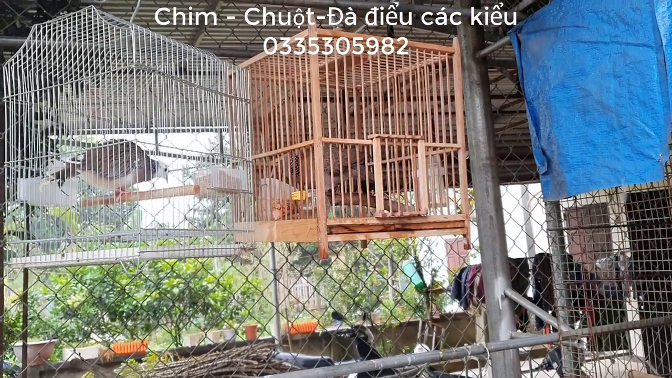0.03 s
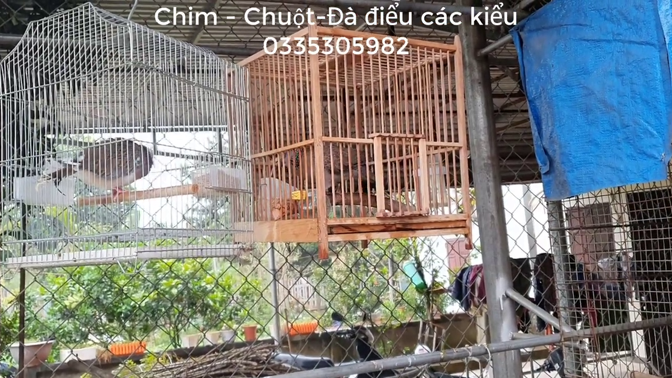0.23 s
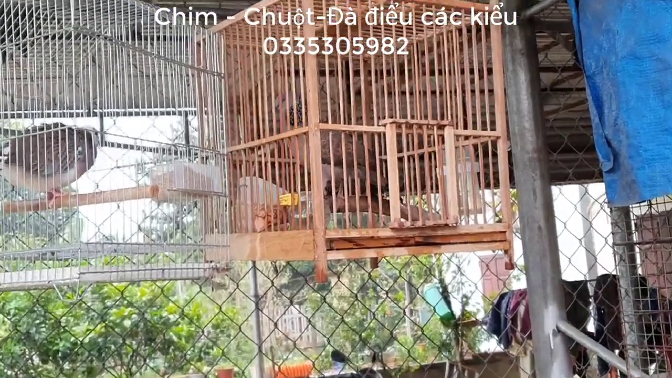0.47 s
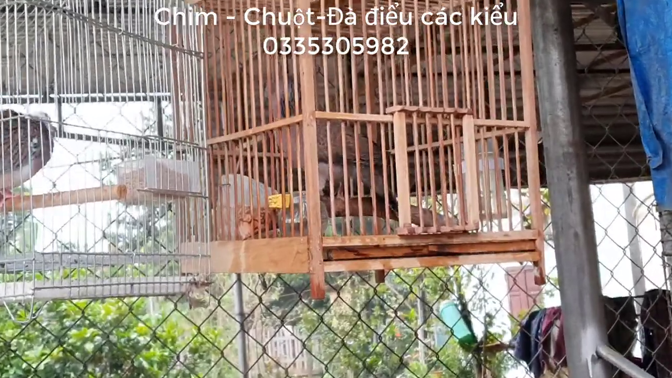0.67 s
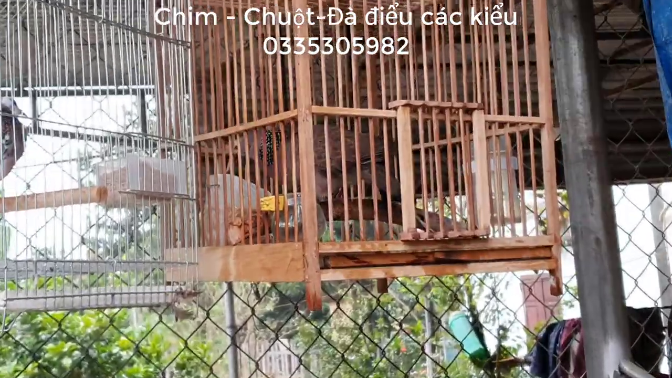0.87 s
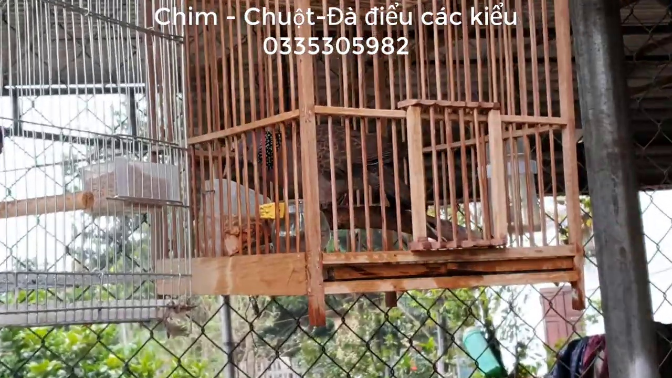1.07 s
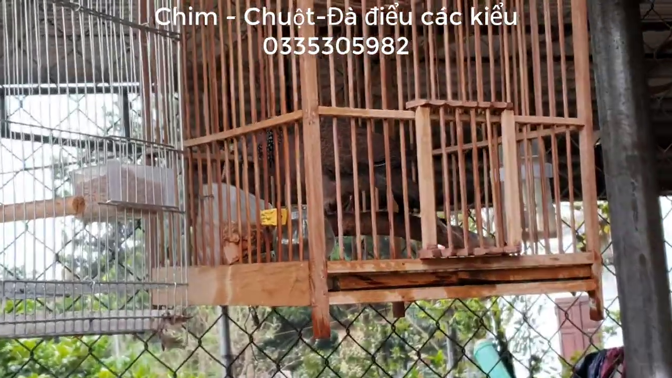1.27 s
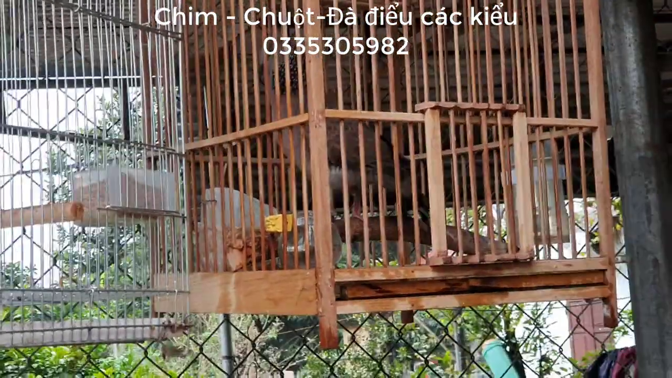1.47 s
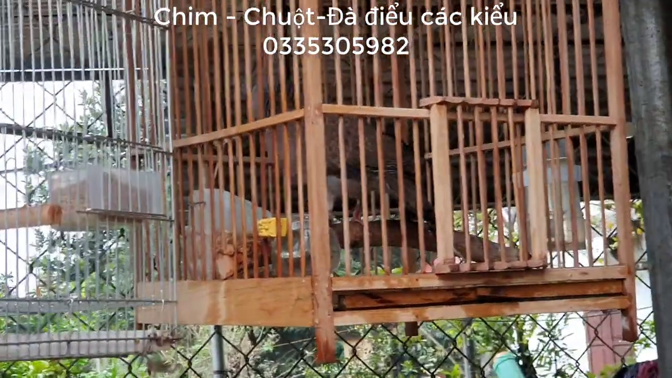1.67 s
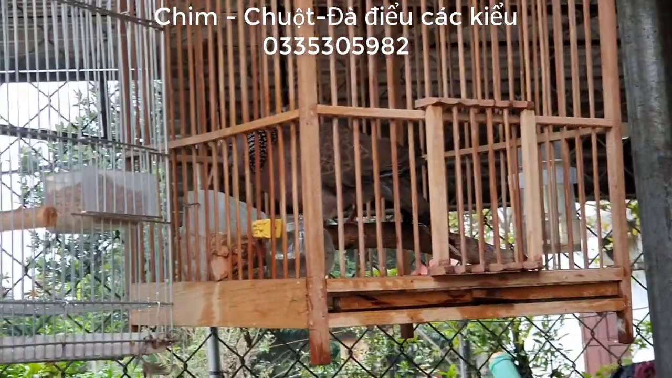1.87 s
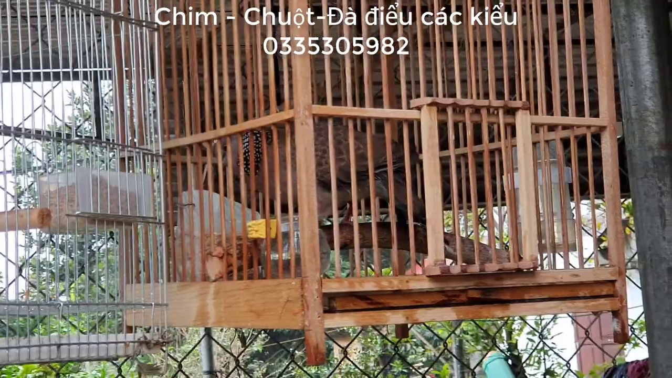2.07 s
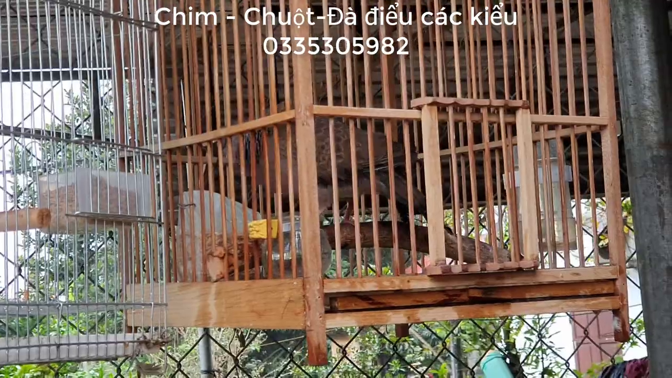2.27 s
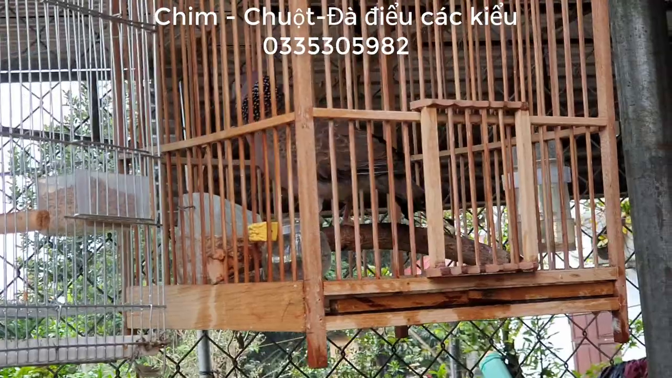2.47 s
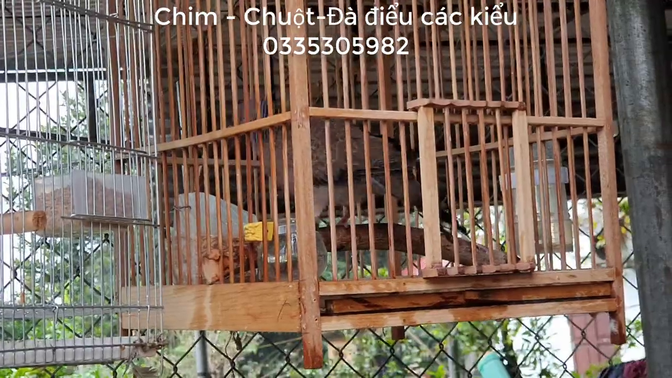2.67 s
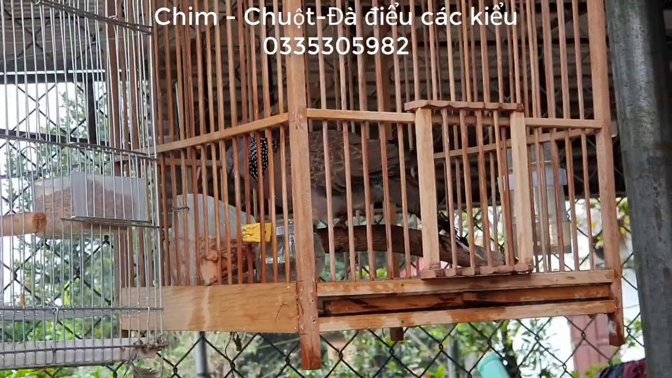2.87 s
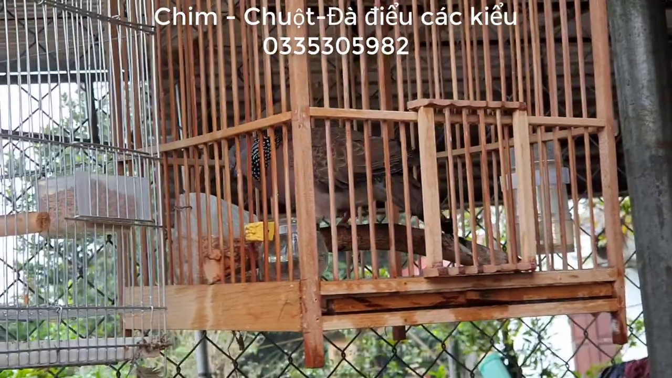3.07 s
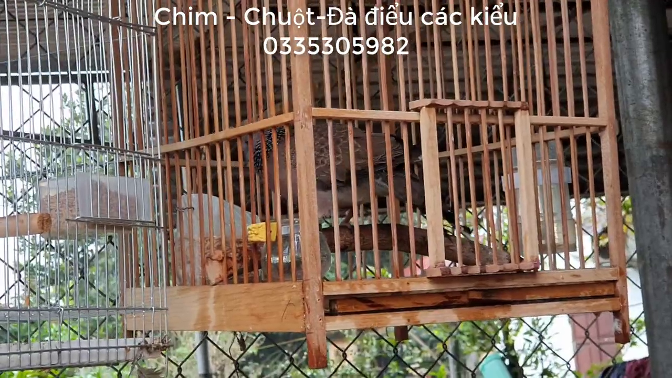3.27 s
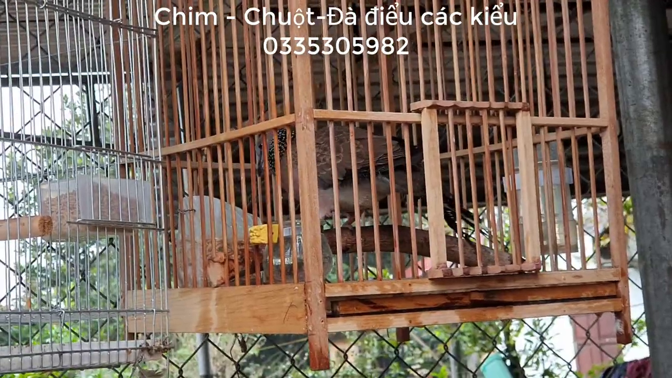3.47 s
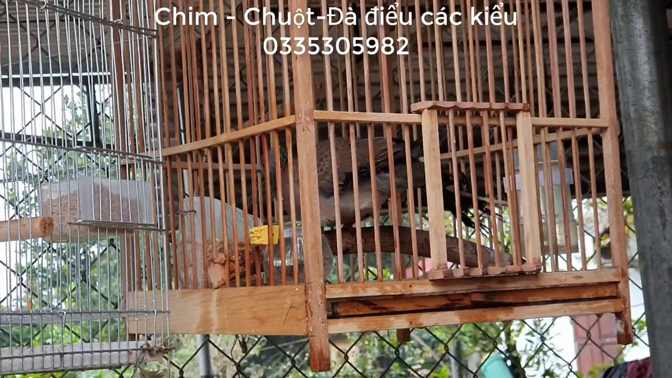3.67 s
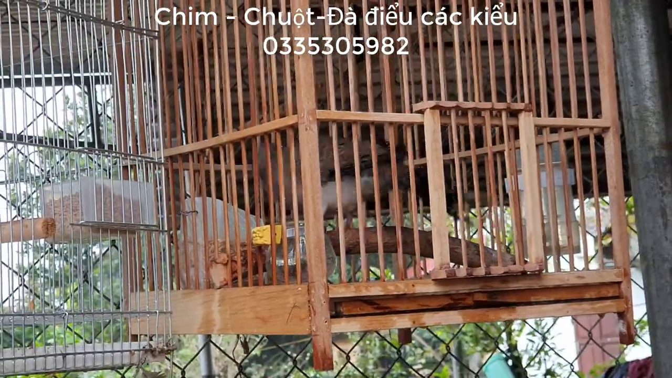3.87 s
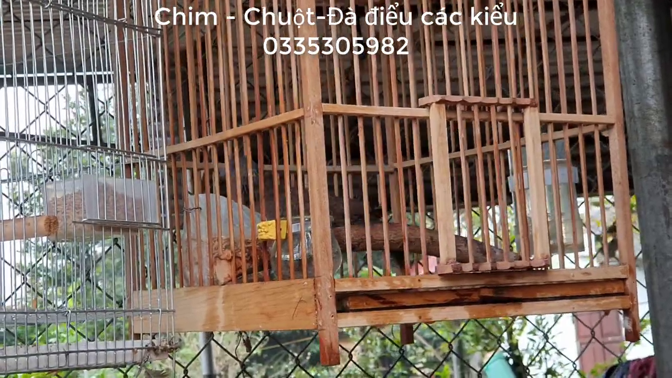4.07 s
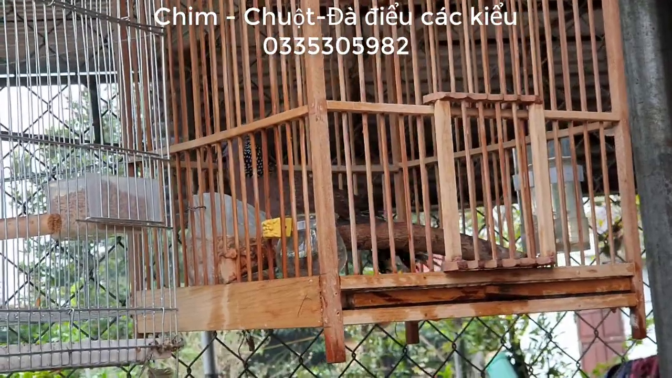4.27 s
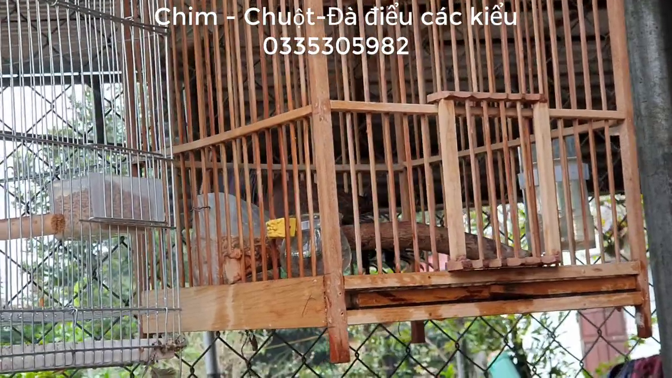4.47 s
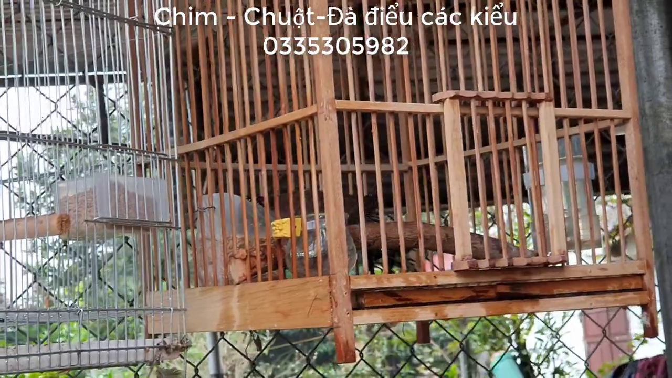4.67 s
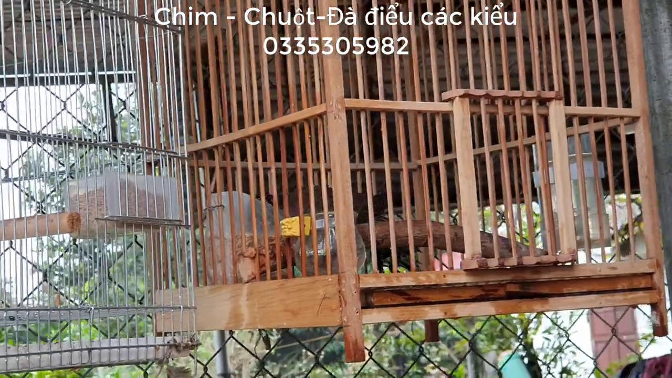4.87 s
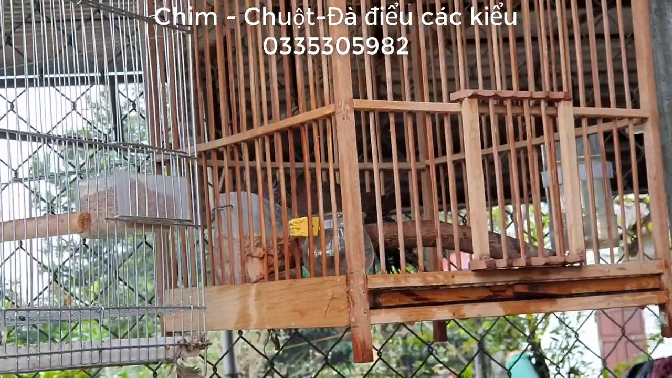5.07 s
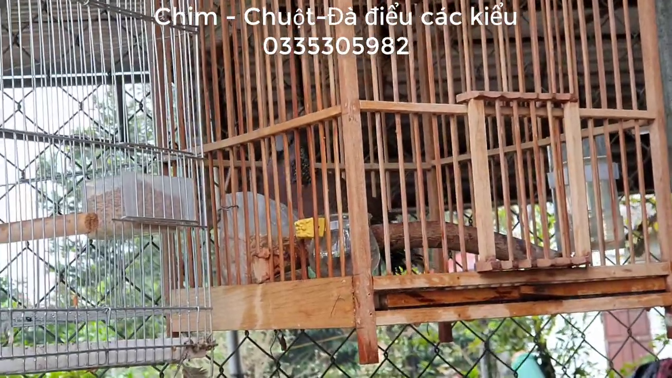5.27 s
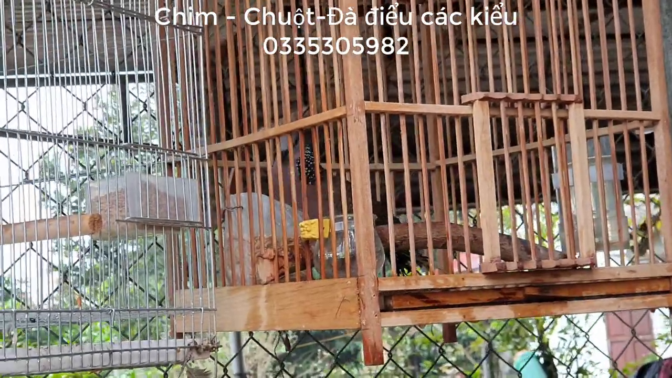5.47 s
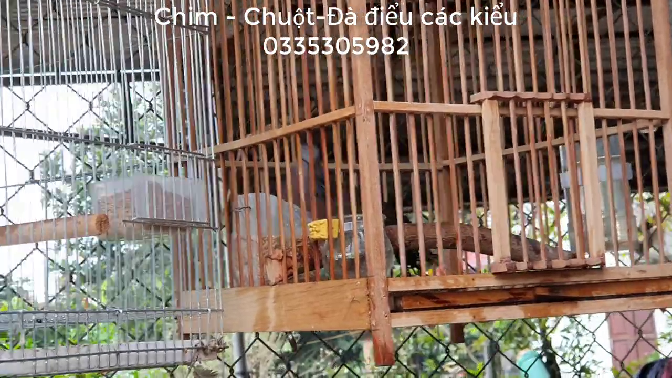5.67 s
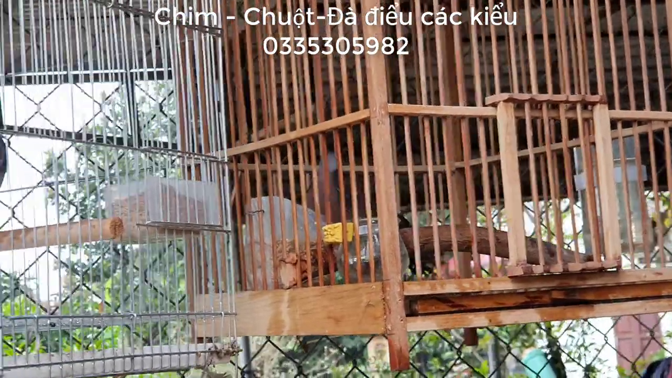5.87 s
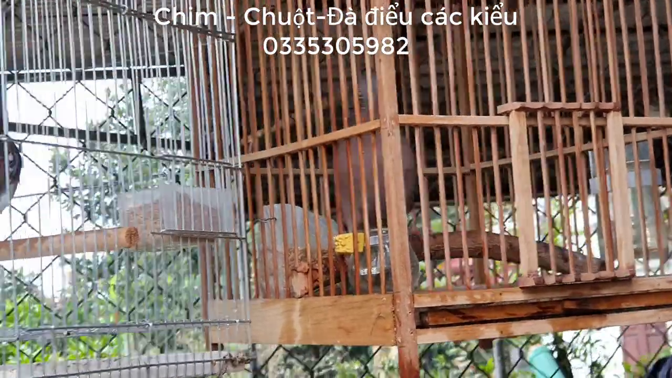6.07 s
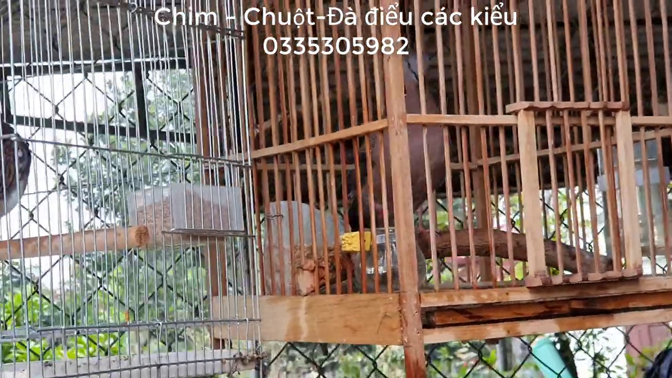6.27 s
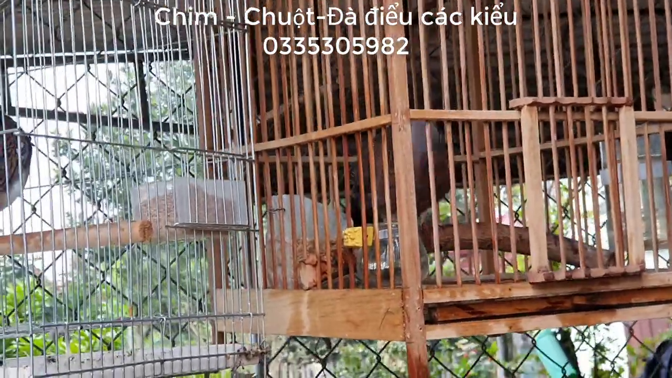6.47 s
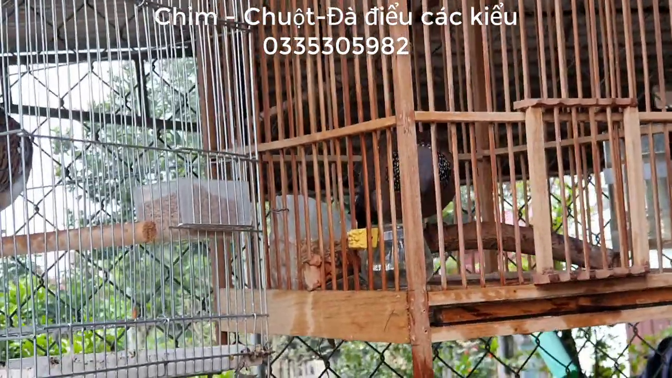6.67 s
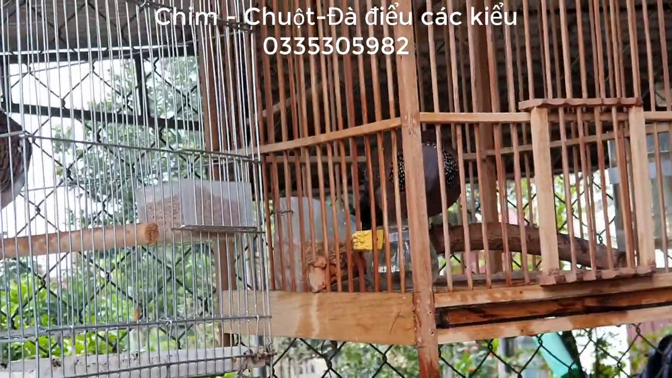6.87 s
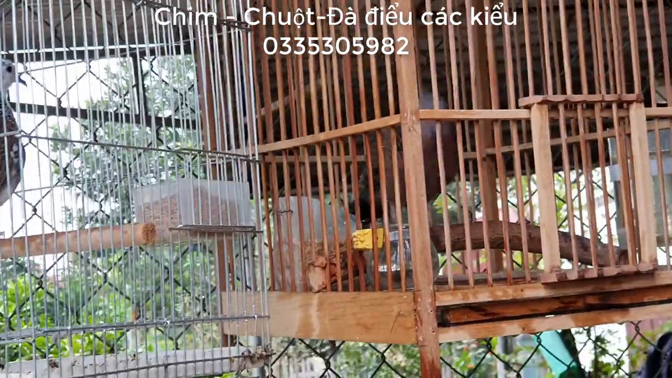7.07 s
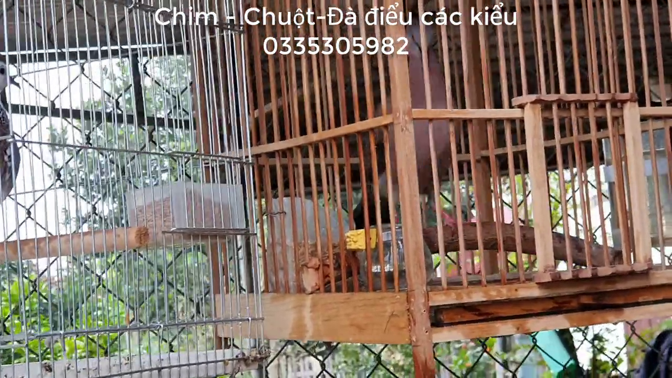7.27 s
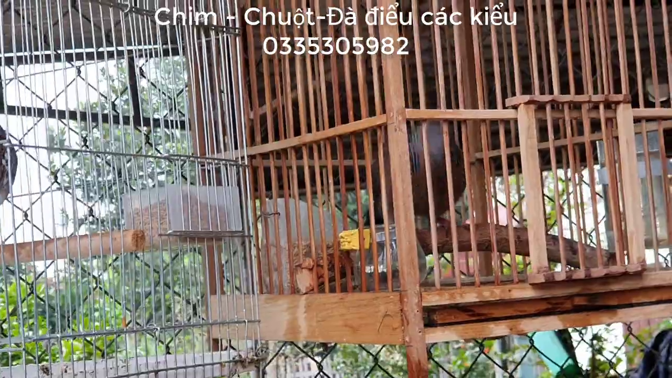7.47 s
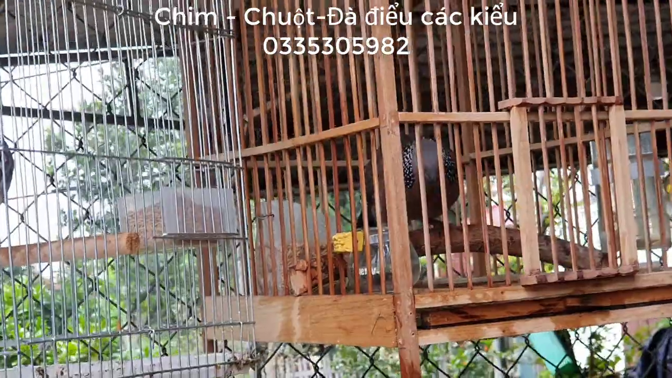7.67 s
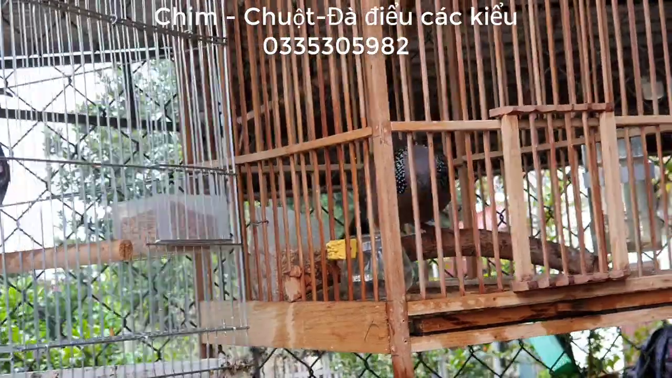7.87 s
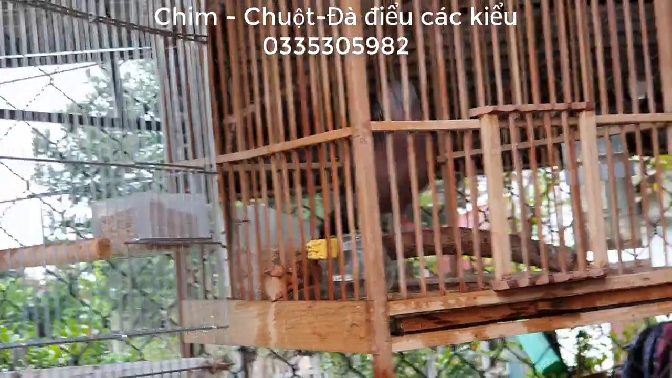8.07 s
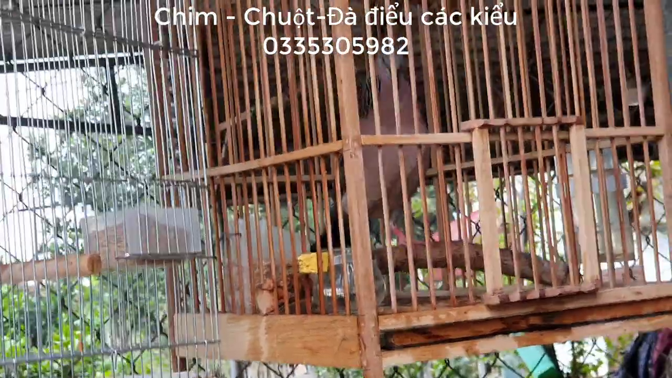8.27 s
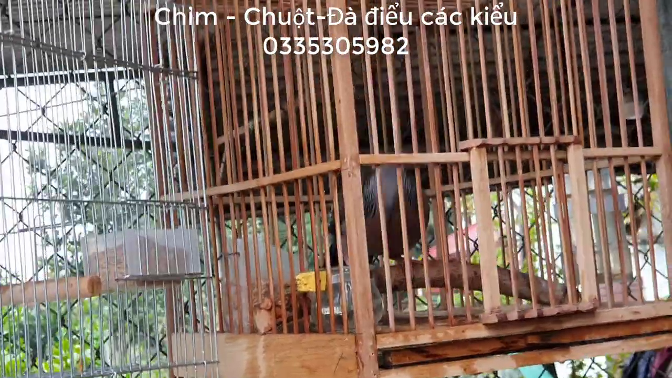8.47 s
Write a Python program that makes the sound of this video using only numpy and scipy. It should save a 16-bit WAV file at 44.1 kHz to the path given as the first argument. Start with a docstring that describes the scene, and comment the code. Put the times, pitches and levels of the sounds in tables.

```python
"""A dove coos again and again in a wooden cage under an open shed: a short rolled note, then a long arch.
Two close voices of its syrinx beat to make the roll, and its swollen throat resonates at the fundamental.
Its claws tick and its feathers brush the bars; far birds chirp and a thin trill, probably insects, sounds
over a low outdoor rumble and a background hiss. The shed reverberates. Once a finger knocks the left port
of the hand-held microphone and slides across it."""
import sys
import numpy as np
from scipy import signal
from scipy.fft import rfft, irfft, next_fast_len
from scipy.io import wavfile
from scipy.ndimage import map_coordinates

SR = 44100
rng = np.random.default_rng(int(sys.argv[2]) if len(sys.argv) > 2 else 0)


def unload_audio(sound):
    """Save the sound as a 16-bit wav file, at the path given as the first command line argument."""
    columns = np.transpose(np.atleast_2d(sound))
    # keep every value between -1 and 1, then stretch to whole-number steps
    steps = np.round(np.clip(columns, -1, 1) * 32767)
    wavfile.write(sys.argv[1], SR, steps.astype(np.int16))


N = 375732

# Levels in the tables are relative: each source applies further gains.
# short rolled notes: start_s, length_s, top_hz, sag_hz, level_db, swell_db
SHORT_COOS = [(0.779, 0.11, 653.4, 21, -16.5, 3), (1.759, 0.11, 651, 23, -16.5, 3.5),
              (2.777, 0.11, 642, 31, -17, 2.5), (4.554, .2, 637, 68, -18.5, 0),
              (6.495, .123, 634, 15.7, -18, 3.5), (7.457, 0.11, 644, 11, -15, 2.5),
              (8.45, 0.11, 639, 5.2, -15.5, 2)]
# long arched notes: start_s, length_s, top_hz, sag_hz, level_db, swell_at_fraction
LONG_COOS = [(.024, 0.45, 694.3, 140.8, -14, .66), (0.983, 0.39, 668.6, 123.5, -14, 0.55),
             (1.976, 0.36, 664, 118.7, -14, .53), (2.974, .353, 657.4, 112.3, -14.5, 0.45),
             (4.858, .45, 670.8, 126.2, -13.5, .54), (6.725, 0.39, 645.6, 120.4, -15, .42),
             (7.66, 0.36, 652.3, 144.8, -15.5, .46)]
# resonance of the inflated throat: frequency_hz, gain_db
THROAT = [(400, -2), (520, 2), (630, -0.5), (710, -1.5), (790, -15.5), (950, -10.5)]
# breath noise in a coo: frequency_hz, gain_db
HUSK = [(120, -14.5), (400, -25.0), (850, 4.5), (1400, -11.5), (2500, -20.5), (6000, -47.5)]
# claw impacts on perch and bars: start_s, level_db, centre_hz
TICKS = [(0.345, -31.5, 1900), (.401, -29, 8100), (0.55, -26.5, 6630), (.755, -51, 1210),
         (1.491, -36.5, 11260), (1.667, -30.5, 12170), (1.819, -33, 7700), (2.8365, -34.5, 5920),
         (2.844, -28.5, 7500), (3.21, -27.5, 8700), (3.58, -34.5, 4920), (3.893, -39.5, 2000),
         (4.048, -30, 5960), (4.289, -33, 1510), (4.604, -29, 9740), (4.721, -32, 1740),
         (5.056, -30.5, 5500), (5.305, -37.5, 9750), (5.777, -34.5, 2550), (5.921, -34, 2510),
         (6.061, -39.5, 1500), (6.927, -29, 1780), (7.447, -29.5, 8700), (7.692, -21.5, 12400),
         (8.427, -30, 3800)]
# feather strokes: start_s, length_s, level_db, scuff_db
SHUFFLES = [(0.26, 0.36, -52.5, 8.5), (1.412, 0.059, -58, 15), (2.811, 0.12, -48, -6.5),
            (3.498, 0.14, -43, -30), (3.877, 0.18, -50, -3.5), (4.279, .22, -55.5, 12),
            (5.417, 0.097, -48.5, 5.5), (5.775, 0.22, -46, 1.5), (6.299, .19, -54.5, 5),
            (6.547, 0.08, -45, -4), (7.159, .09, -46, 0.5), (7.821, 0.27, -51, -12.5)]
# bright brushing of a stroke, and the low scuff under it: frequency_hz, gain_db
FEATHERS = [(700, -16.5), (2000, 5.5), (4000, 5), (6000, 1), (9000, 4), (11000, 0.5), (13000, 3.5),
            (15800, -10)]
SCUFF = [(60, -11), (200, 0), (900, -1.5), (2000, -11.5), (4000, -20.5), (9000, -35.5)]
# finger sliding over the port: time_s, hiss_db, rumble_db
RUB = [(2.365, -46.5, -33), (2.383, -26.5, -17), (2.397, -13, -11), (2.425, -16, -25.5), (2.46, -19, -34.5),
       (2.505, -20.5, -56.5), (2.537, -17.5, -29), (2.546, -34, -27.5), (2.565, -52.5, -44.5)]
# hiss of the skin, and rumble in the port: frequency_hz, gain_db
SKIN = [(700, -23.5), (1300, -10), (2500, -0.5), (4500, 2.5), (6500, -0.5), (8000, -9), (15800, -12.5)]
PORT = [(25, -25), (80, -4.5), (350, -11.5), (1000, -7), (2000, -17), (5000, -48.5)]
# pressure pops in the port: start_s, level_db, ring_hz, t60_s
POPS = [(2.3016, 8.5, 710, 0.0031), (2.2998, -10.5, 1590, 0.0042), (2.3052, -13, 92, 0.08),
        (2.321, -6.5, 1180, 0.0023), (2.4031, 1.5, 108, 0.016), (2.5298, -22, 3470, .005)]
# distant chirps: start_s, length_s, start_hz, end_hz, level_db
CHIRPS = [(0.689, 0.024, 2547, 2430, -49), (2.117, 0.018, 2615, 2340, -40.5), (3.1, 0.21, 2976, 3300, -55),
          (5.061, 0.018, 2610, 2550, -43.5), (6.578, 0.039, 2450, 2360, -47.5),
          (7.623, 0.23, 3370, 3630, -54.5), (7.821, 0.13, 4240, 4260, -48.5), (7.925, 0.1, 3310, 3760, -50),
          (8.14, 0.021, 2530, 2550, -44)]
# bouts of trilling: start_s, length_s, level_db
TRILLS = [(0.804, 0.45, -63.5), (1.8, .84, -63.5), (2.749, 0.76, -67.5), (5.35, .6, -68),
          (6.302, .85, -67.5), (7.901, 0.84, -66)]
# outdoor rumble, and background hiss: frequency_hz, gain_db
RUMBLE = [(20, -16.5), (38, 0.5), (65, 0.5), (110, -8.5), (180, -11.5), (400, -15), (900, -31), (2000, -60)]
HISS = [(100, 8), (500, 14.5), (900, 9.5), (1900, -1), (2800, -2), (6500, -7), (9000, -7), (10800, -11.5),
        (12500, -8.5), (15800, -20.5)]
# level of the background hiss: time_s, level_db
HISS_LEVEL = [(0.0, -44.5), (.7, -48), (1.15, -44.5), (1.65, -49), (2.2, -45.5), (3.11, -44), (3.37, -50),
              (5.1, -45.5), (5.24, -50), (6.05, -51), (7.02, -42.5), (7.3, -48.5), (8.52, -44.5)]
# likeness of the diffuse field at the two ports: frequency_hz, correlation
COHERENCE = [(100, 0.96), (300, 0.99), (640, 0.6), (1400, 0)]
# reverberation time of the shed: frequency_hz, t60_s
SHED_DECAY = [(300, 0.12), (650, 0.52), (3000, 0.43), (12000, 0.017)]

ROLL_HZ, STRAINED_ROLL_HZ = 97.87, 56.1  # beat rate of the two voices, at ease and at full strain


def dove():
    """Superposition: short and long coos add into one track of phrases."""
    out = np.zeros(N)
    for s, *note in SHORT_COOS:
        add(out, s, short_coo(*note))
    for s, *note in LONG_COOS:
        add(out, s, long_coo(*note))
    return out


def short_coo(length, top_hz, sag_hz, db, swell_db, swell_at=0.63, swell_width=0.19):
    """Beating: two voices a steady interval apart make a roll; the swell weakens the upper one."""
    t = np.arange(int(length * SR)) / SR
    pitch, shape_db = arch(t, top_hz, sag_hz, scoop_s=0.04, attack_s=0.04, sag_from=0.15,
                           drop_hz=110, release_db=11, release_s=0.026)
    push_db = swell_db * np.exp(-((t / length - swell_at) / swell_width) ** 2)
    upper_ratio = 0.85 * (1 - 0.26 * push_db)
    return coo(t, pitch, db + shape_db + push_db, upper_ratio, ROLL_HZ, jitter=0.06)


def long_coo(length, top_hz, sag_hz, db, swell_at, swell_db=6.5, swell_width=0.1644,
             tire_from=0.67, tire_db=13, quaver_hz=18):
    """Beat rate equals spacing: the voices draw together as the note swells, and the roll slows."""
    t = np.arange(int(length * SR)) / SR
    progress = t / length
    pitch, shape_db = arch(t, top_hz, sag_hz, scoop_s=0.0713, attack_s=0.061, sag_from=0.33,
                           drop_hz=35.2, release_db=1, release_s=0.033)
    past_peak = progress - swell_at
    swell = np.exp(-(past_peak / swell_width) ** 2)
    strain = np.exp(-(past_peak / np.where(past_peak < 0, 0.43, 0.255)) ** 2)
    tired = ramp((progress - tire_from) / (1 - tire_from))  # the note runs out of air
    # upper voice over lower, in amplitude: it gains the lead, yields in the swell and stays weak
    first, leading, merged, last = 0.733, 1.724, 0.25, 0.396
    upper_ratio = first + (leading - first) * ramp(progress / (swell_at - swell_width)) ** 2
    upper_ratio += (last - upper_ratio) * ramp(past_peak / swell_width + 1)
    upper_ratio += (merged - upper_ratio) * swell
    beat_hz = ROLL_HZ + (STRAINED_ROLL_HZ - ROLL_HZ) * strain
    pitch = pitch + quaver_hz * strain * wobble(len(t), 110.07)
    level_db = db + shape_db + swell_db * swell - tire_db * tired
    return coo(t, pitch, level_db, upper_ratio, beat_hz, jitter=0.15)


def arch(t, top_hz, sag_hz, scoop_s, attack_s, sag_from, drop_hz, release_db, release_s,
         scoop_hz=155.4, onset_db=19):
    """Pitch and level envelopes: both rise, the pitch sags ever faster, both drop as the breath stops."""
    scoop = ramp(1 - t / scoop_s) ** 2
    sag = ramp((t / t[-1] - sag_from) / (1 - sag_from)) ** 1.5
    closing = ramp(1 - (t[-1] - t) / release_s) ** 2
    pitch = top_hz - scoop_hz * scoop - sag_hz * sag - drop_hz * closing
    return pitch, -onset_db * ramp(1 - t / attack_s) ** 2 - release_db * closing


def coo(t, pitch, db, upper_ratio, beat_hz, jitter,
        sideband_db=-17, ceiling_db=-8, overtone_db=-41, husk_db=-35):
    """Coupled oscillators: two voices of the syrinx beat, and the throat resonance filters their sum."""
    n = len(t)
    beat_phase = 2 * np.pi * np.cumsum(beat_hz * (1 + jitter * wobble(n, 49.66))) / SR
    # the heard pitch lies between the voices, nearer to the stronger one
    power = 1 + upper_ratio ** 2
    lower_phase = 2 * np.pi * np.cumsum(pitch - beat_hz * upper_ratio ** 2 / power) / SR
    # coupling makes the upper voice slip in phase and puts a weak sideband underneath
    slip_rad = (0.26 + fade(t, 0.11) ** 4) * wobble(n, 54.96)
    upper = upper_ratio * np.exp(1j * (beat_phase + slip_rad))
    voice = (1 + upper + amp(sideband_db) * upper.conj()) * np.exp(1j * lower_phase) / np.sqrt(power)
    # the membranes falter in level and phase, most in the heart of a long note
    falter = 0.28 * fade(t, 0.12) ** 4
    voice *= np.exp(falter * (wobble(n, 90.24) + 1j * wobble(n, 70)) - falter ** 2)
    # their limited swing saturates the amplitude
    voice /= (1 + (np.abs(voice) * amp(db - ceiling_db)) ** 4) ** (1 / 4)
    # the closed bill and swollen throat let out little but the fundamental
    fundamental = filtered(voice.imag, lambda hz: amp(along(THROAT, hz)))
    tone = np.sqrt(2) * (fundamental + amp(overtone_db) * (voice ** 2).imag)
    husk = amp(husk_db) * np.abs(voice) * noise(n, HUSK)
    return amp(db) * fade(t, 0.00096) * (tone + husk)


def claws(t60_s=0.022, gain_db=-3):
    """Impact: each tap on wood is a burst of noise that decays exponentially."""
    out = np.zeros((2, N))
    t = np.arange(SR // 16) / SR
    for s, db, hz in TICKS:
        colour = [(hz / 8, -18), (hz / 2, -7), (hz, 0), (hz * 2, -9), (hz * 8, -26)]
        add(out, s, amp(db + gain_db - 60 * t / t60_s) * noise((2, len(t)), colour))
    return out


def feathers(grain_db=3, pressure_db=3, fall_db=5):
    """Friction: barbs catch quickly on the bars while the pressure of the stroke comes and goes."""
    out = np.zeros((2, N))
    for s, length, db, scuff_db in SHUFFLES:
        n = int(length * SR)
        t = np.arange(n) / SR
        grains = unit(amp(grain_db * wobble(n, 400) + pressure_db * wobble(n, 35)))
        brush = noise((2, n), FEATHERS) + amp(scuff_db) * noise(n, SCUFF)
        add(out, s, amp(db + fall_db * (0.5 - t / length)) * fade(t, 0.0063) * grains * brush)
    return out


def finger(grain_db=1.0):
    """Damped resonance and friction: skin pops the air in the port, then drags over its rim."""
    out = np.zeros(N)
    t, hiss_db, rumble_db = curves(RUB)
    n = len(t)
    drag = amp(hiss_db + grain_db * wobble(n, 480)) * noise(n, SKIN)
    add(out, t[0], drag + amp(rumble_db) * noise(n, PORT))
    t = np.arange(SR // 16) / SR
    for s, db, hz, t60 in POPS:
        add(out, s, amp(db - 60 * t / t60) * np.sin(2 * np.pi * hz * t))
    return out


def far_birds(waver=0.0046, rasp=0.05, flutter_db=4, overtone_db=-15):
    """Random frequency modulation: gliding chirps waver, and the shortest turn hoarse."""
    out = np.zeros(N)
    for s, length, start_hz, end_hz, db in CHIRPS:
        n = int(length * SR)
        t = np.arange(n) / SR
        depth = waver + rasp * np.exp(-(length / 0.13) ** 2)
        drift = 0.012 * wobble(n, 60)
        jitter = depth * (wobble(n, 150) + wobble(n, 1200))
        hz = np.linspace(start_hz, end_hz, n) * (1 + drift + jitter)
        flutter = unit(amp(flutter_db * wobble(n, 35)))
        phase = 2 * np.pi * np.cumsum(hz) / SR
        tone = np.sin(phase) + amp(overtone_db) * np.sin(2 * phase)
        add(out, s, amp(db) * fade(t, length / 3) * flutter * tone)
    return out


def trill(centre_hz=4200, half_width_hz=130, flicker_db=2):
    """Amplitude modulation: a narrow, shrill band of noise flickers in bouts, like far insects."""
    out = np.zeros(N)
    for s, length, db in TRILLS:
        t = np.arange(int(length * SR)) / SR
        white = rng.standard_normal(len(t))
        band = filtered(white, lambda hz: 1 / (1 + ((hz - centre_hz) / half_width_hz) ** 4))
        flicker = amp(flicker_db * wobble(len(t), 40))
        add(out, s, amp(db) * fade(t, 0.083) * unit(flicker * band))
    return out


def shed(x, predelay_s=0.012):
    """Reverberation: roof and walls answer, each frequency decaying at its own rate."""
    hz, t, spectra = signal.stft(rng.standard_normal((2, SR // 2)), SR, nperseg=256)
    decay = amp(-60 * t / along(SHED_DECAY, hz)[:, None])
    tail = signal.istft(spectra * decay, SR, nperseg=256)[1]
    tail = np.pad(tail / np.linalg.norm(tail[0]), ((0, 0), (round(predelay_s * SR), 0)))
    return signal.fftconvolve(x, tail, axes=1)[:, :N]


def outdoors(rumble_db=-47, hiss_gain_db=1, drift_db=1):
    """Ambient noise: a steady rumble lies under a background hiss that swells and drops."""
    s, db = np.transpose(HISS_LEVEL)
    hiss_db = np.interp(np.arange(N) / SR, s, db) + hiss_gain_db + drift_db * wobble(N, 24)
    return amp(rumble_db) * diffuse(RUMBLE) + amp(hiss_db) * diffuse(HISS)


def diffuse(spectrum):
    """Diffuse field: noise from all around is coherent at the two ports in the bass only."""
    side_gain = lambda hz: np.tan(np.arccos(np.clip(along(COHERENCE, hz), -1, 1)) / 2)
    mid = noise(N, spectrum)
    side = filtered(noise(N, spectrum), side_gain)
    return np.array([mid + side, mid - side])


def amp(db):
    """Decibels to amplitude ratio."""
    return 10 ** (np.asarray(db) / 20)


def unit(x):
    """Normalisation to rms 1."""
    return x / np.sqrt(np.mean(np.abs(x) ** 2) + 1e-20)


def ramp(x):
    """Limiting to the range 0 to 1."""
    return np.clip(x, 0, 1)


def along(points, hz):
    """Interpolation of (frequency_hz, value) points on a log axis."""
    f, v = np.transpose(points)
    return np.interp(np.log(hz + 1), np.log(np.abs(f) + 1), v)


def curves(rows):
    """Linear interpolation: sample times over a table's span, then each column at those times."""
    s, *cols = np.transpose(rows)
    t = np.arange(round(s[0] * SR), round(s[-1] * SR)) / SR
    return [t] + [np.interp(t, s, c) for c in cols]


def wobble(n, rate):
    """Smooth random modulation: n samples, rate knots a second."""
    return map_coordinates(rng.standard_normal(int(n * rate / SR) + 4), [np.arange(n) * rate / SR])


def fade(t, edge):
    """Sine taper over edge seconds at each end."""
    return np.sin(np.pi / 2 * ramp(np.minimum(t - t[0], t[-1] - t) / edge))


def add(track, s, x):
    """Superposition of x on the track from time s."""
    i = max(round(s * SR), 0)
    track[..., i:i + x.shape[-1]] += x[..., :max(N - i, 0)]


def filtered(x, response):
    """Linear filtering: the spectrum of x times a frequency response."""
    n = x.shape[-1]
    m = next_fast_len(n + SR // 4)
    return irfft(rfft(x, m) * response(np.fft.rfftfreq(m, 1 / SR)), m)[..., :n]


def noise(shape, spectrum):
    """Spectral shaping: coloured noise of rms 1."""
    return unit(filtered(rng.standard_normal(shape), lambda hz: amp(along(spectrum, hz))))


def pan(x, left_db):
    """Level difference: stereo with the left side louder by left_db."""
    return x * amp([[left_db / 2], [-left_db / 2]])


def scene(wall_delay_s=0.034, wall_db=-30):
    """Direct and reflected sound: the dove is close and mostly direct, the far birds reverberant."""
    coos = dove()
    fidgets = claws() + feathers()
    far_calls = far_birds() + trill()
    direct = pan(coos, left_db=2.0) + pan(fidgets, left_db=-3.0) + pan(far_calls, left_db=-10.5)
    echo = shed(amp(-14) * coos + amp(-7.5) * fidgets + amp(0.5) * far_calls)
    add(echo, wall_delay_s, amp(wall_db) * coos)  # a wall throws the coo back once
    touch = finger() * amp([[0], [-26]])  # almost wholly on the left
    return direct + echo + touch + pan(outdoors(), left_db=-0.7)


def record(dry, low_hz=35, top_hz=15800):
    """Band limiting and clipping: the deepest bass is cut, peaks stop at full scale, the top is cut."""
    lean = signal.sosfilt(signal.butter(2, low_hz, "high", fs=SR, output="sos"), dry)
    return filtered(np.clip(lean, -1, 1), lambda hz: hz < top_hz)


dry = scene()
out = record(dry)
unload_audio(out)
```